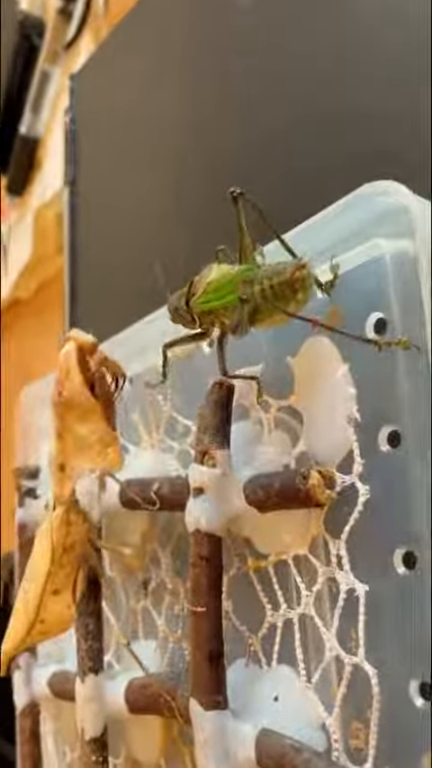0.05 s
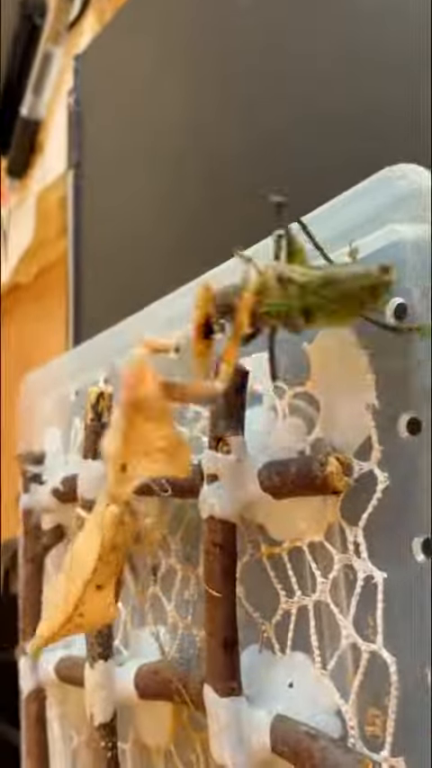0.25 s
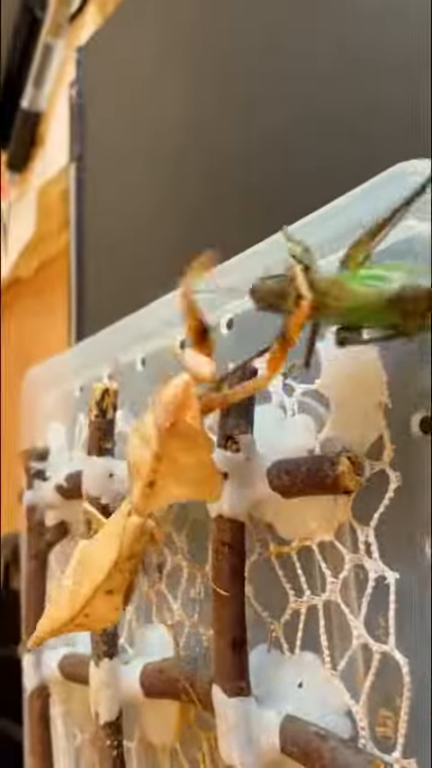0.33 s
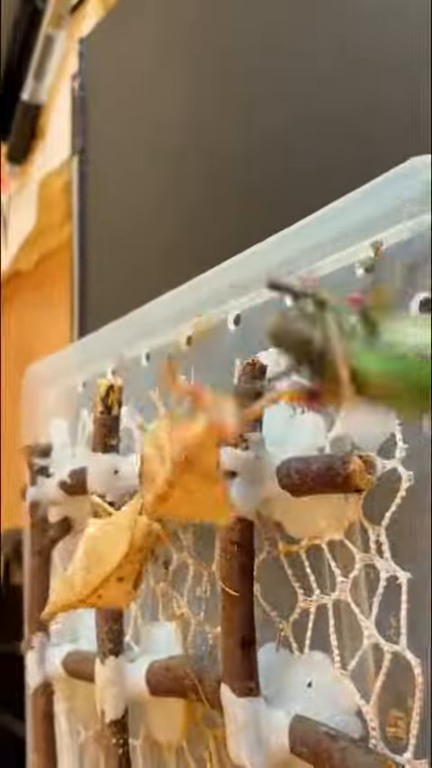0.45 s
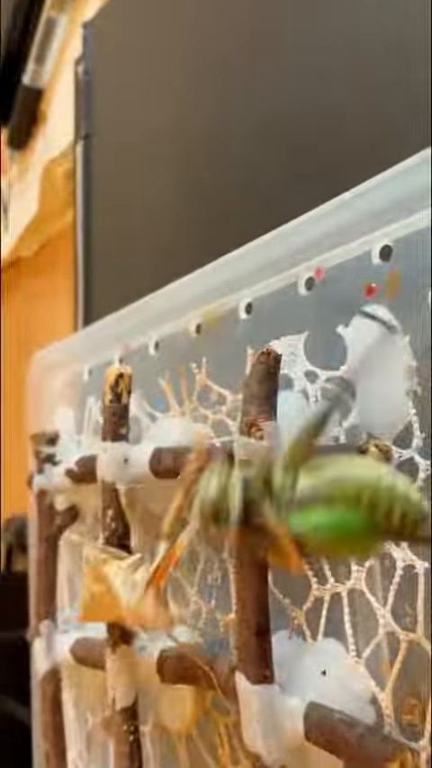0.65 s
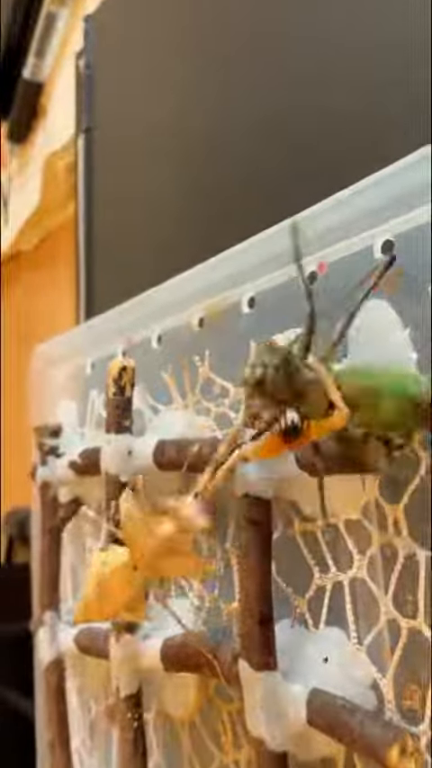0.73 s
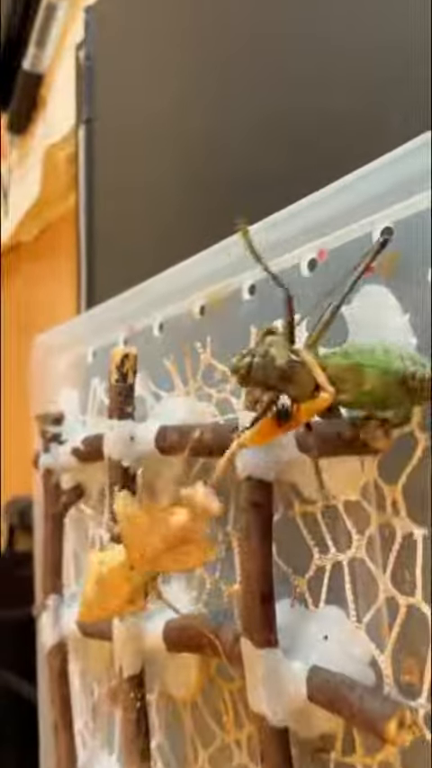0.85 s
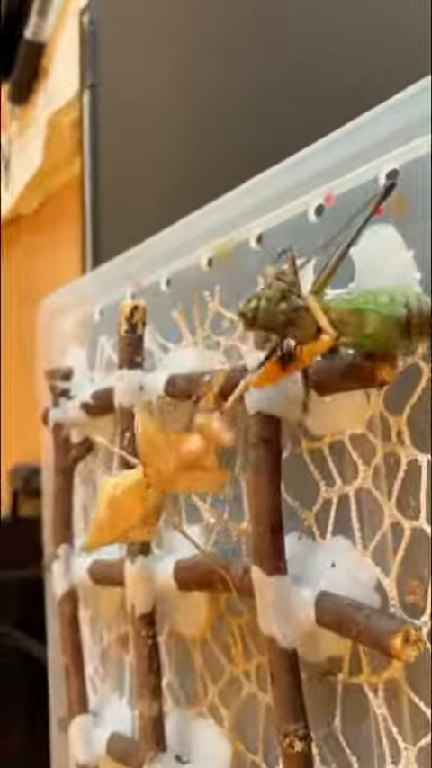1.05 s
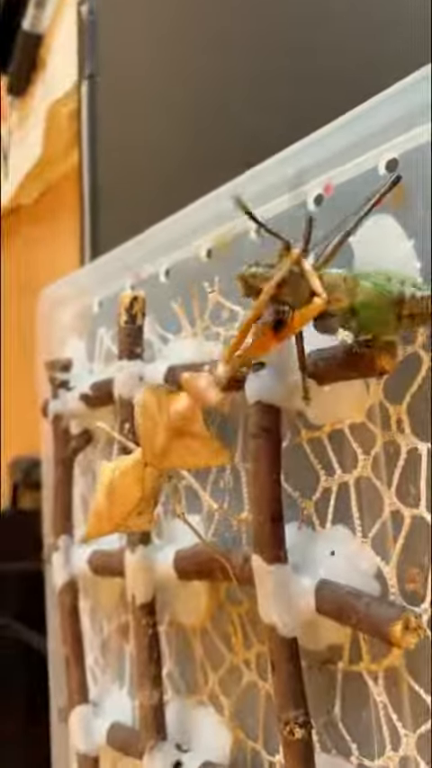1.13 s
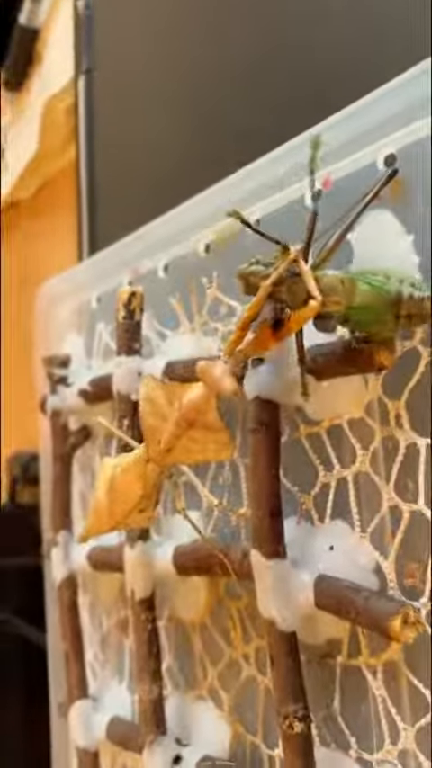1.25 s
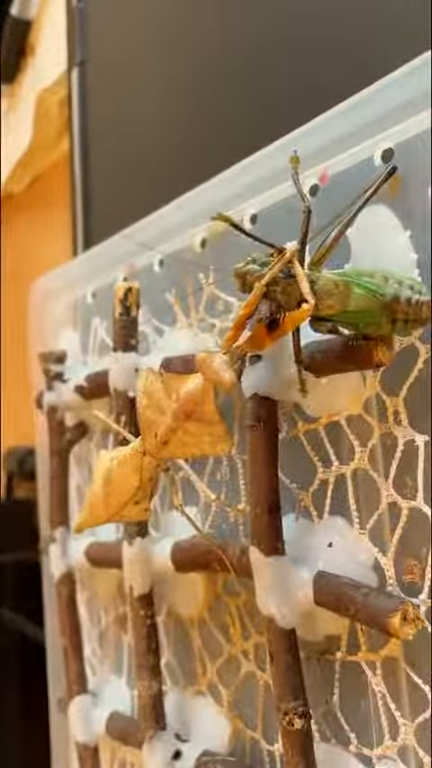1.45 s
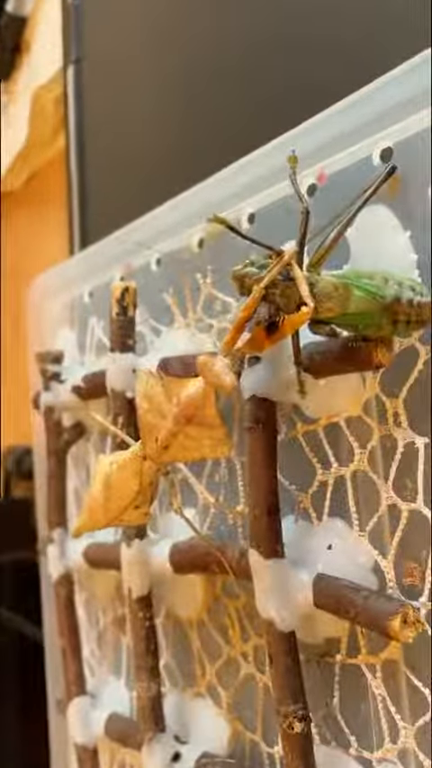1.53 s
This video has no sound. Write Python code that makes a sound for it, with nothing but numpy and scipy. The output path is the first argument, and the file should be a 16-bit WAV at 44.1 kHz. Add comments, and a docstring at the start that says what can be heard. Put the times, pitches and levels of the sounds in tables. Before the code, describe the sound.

One sharp snap, then light knocks and dry rustles as two insects scuffle on twigs.

```python
"""One sharp snap, then knocks, scrabbling and dry rustles: two insects scuffle close by in a small room.
They are a large bush cricket and a leaf-like insect, on a twig lattice in a plastic box.
Bodies and legs knock on twigs and plastic and make them ring; claws scratch and wings rustle.
The lattice thumps softly under their weight, over a low room rumble and a faint hiss."""
import sys
import numpy as np
from scipy import signal
from scipy.fft import rfft, irfft
from scipy.io import wavfile

SR = 44100
rng = np.random.default_rng(int(sys.argv[2]) if len(sys.argv) > 2 else 0)


def unload_wav(signal):
    """Save mono or channel-first audio to the path in sys.argv[1] as 16-bit WAV at rate SR, clipped to [-1, 1]."""
    wavfile.write(
        sys.argv[1],
        SR,
        np.round(np.clip(np.atleast_2d(signal).T, -1, 1) * 32767).astype(np.int16),
    )


N = 70560
TIME = np.arange(N) / SR
SPECTRUM_HZ = np.maximum(np.fft.rfftfreq(N, 1 / SR), 1)

# Brittle clicks: start_s, level_db
SNAP_CLICKS = [(0.205, -52), (.2085, -42.5), (0.2093, -39.5), (.2104, -37.5), (0.2105, -26), (.2122, -31),
               (0.2132, -36), (0.2125, -40), (0.2161, -45), (.2700, -48), (0.2727, -48.5), (.4760, -50),
               (.4860, -54), (1.149, -56.5), (1.3018, -73.5), (1.308, -76)]
# Tones each click rings with: pitch_hz, level_db, ring_s (time to fade by 60 dB)
SNAP_TONES = [(680, -34, 0.0071), (1253, -26, .0035), (2757, -21, .003), (4220, -26.5, 0.0046),
              (5240, -40, .004), (6720, -13, .0045), (7125, -4.5, .0035), (7750, -8, 0.0059),
              (8246, -7.5, .005), (9850, -14.5, 0.0018), (11600, -12, 0.0024), (12600, -11.5, 0.0032),
              (14000, -10.5, 0.002), (15300, -10.5, 0.0018)]
def snap():
    """Brittle clicks ring near 7 kHz. The first ones merge into one snap; faint ones follow."""
    out = np.zeros(N)
    for start_s, level_db in SNAP_CLICKS:
        force = contact(chatter=0.66, chatter_s=0.00097)
        add(out, start_s, from_db(level_db) * ring(force, SNAP_TONES))
    return room(panned(out, left_db=0.96), echo_db=-10.5)


# Knocks: start_s, thud_db, clack_db, tick_db, top_db, chatter_s, left_db, part_pitch_hz, part_db
KNOCKS = [(.3110, -62, -61, -60.5, -75, 0.0042, 12.5, 945, -59),
          (0.3945, -58, -46.5, -50, -55.5, 0.006, 4.5, 1443, -53),
          (0.4748, -65, -58, -60, -60.5, 0.00064, 9, 3550, -51.5),
          (0.4863, -63, -75, -53, -64, 0.0022, 6, 3530, -64),
          (.5050, -53, -46, -43, -56, 0.0025, 6, 4710, -44.5),
          (.5290, -70, -55.5, -51.5, -56, 0.0024, 5.5, 1700, -58.5),
          (.5360, -56, -66, -78, -51, 0.0038, 2, 428, -56.5),
          (.6520, -54, -80, -48.5, -65.5, 0.0028, 8, 970, -51.5),
          (0.692, -67, -77, -72, -87, 0.0033, 4, 1077, -64),
          (0.7079, -81, -71, -50, -77, 0.0044, 10, 1090, -54),
          (0.7468, -58, -46.5, -49, -73, 0.0015, 9.5, 926, -51),
          (.8290, -59, -58.5, -64.5, -75, .004, 4, 633, -59.5),
          (0.889, -69.5, -63, -76.5, -78, 0.00078, 3, 950, -67),
          (1.1494, -87, -67, -53.5, -64, 0.00055, 5.5, 1540, -63),
          (1.2050, -73.5, -71.5, -69.5, -86, 0.0056, 2.5, 945, -70.5),
          (1.2424, -75, -71, -77.5, -87, 0.0011, 11, 1740, -75.5),
          (1.4140, -101, -79, -83, -84, .002, 5, 950, -80.5)]
# Where the thud, clack, tick and top levels apply: pitch_hz
KNOCK_BANDS_HZ = [450, 1200, 4000, 9000]
# Tones of the twigs and plastic: pitch_hz, level_db, ring_s
BOX_TONES = [(185.2, -6.5, 0.09), (322, -3.5, .018), (607, -4.5, 0.013), (864, -4, 0.02), (1075, -8, 0.013),
             (1345, -5.5, .012), (1550, -5.5, 0.013), (2480, -6, 0.0065), (3190, -4, 0.0038),
             (4224, -5, 0.0033), (5070, -7, 0.0072), (6600, -6, 0.0023), (8350, -7.5, 0.0022),
             (10330, -3.5, .0012), (14000, -10, 0.001)]
def knocks():
    """Each knock, dull or hard, rings the lattice and box, plus one tone of the part it hits."""
    part_ring_cycles = 9
    out = np.zeros((2, N))
    for start_s, *band_db, chatter_s, left_db, part_hz, part_db in KNOCKS:
        hardness = list(zip(KNOCK_BANDS_HZ, band_db))
        tones = [(hz, db + at_hz(hardness, hz), ring_s) for hz, db, ring_s in BOX_TONES]
        tones.append((part_hz, part_db, part_ring_cycles / part_hz))
        force = contact(chatter=1, chatter_s=chatter_s)
        add(out, start_s, panned(ring(force, tones), left_db))
    return room(out, echo_db=-10)


# The snap's tail (first three rows), then dry rustles: peak_s, level_db, rise_s, fall_s
CRACKLE_SWELLS = [(.224, -45.5, .006, 0.013), (.2715, -50.5, .003, 0.0072), (.292, -55, .006, .004),
                  (.352, -61, .012, 0.013), (.3635, -54, 0.00091, 0.0018), (.375, -73, .003, 0.013),
                  (.479, -53.5, 0.0018, 0.018), (.5365, -35.5, 0.0025, 0.0045),
                  (.5502, -46.5, 0.0023, 0.0013), (.580, -56, .005, 0.0063), (.5902, -48.5, 0.0031, 0.0019),
                  (.709, -63, 0.012, 0.0068), (.84, -74.5, 0.068, 0.081), (1.125, -79, .007, 0.018),
                  (1.165, -67.5, .006, 0.02), (1.304, -76.5, .002, 0.017)]
# Their colour (how strong the lows and highs are): pitch_hz, relative_db
CRACKLE_COLOUR = [(300, -30), (2000, -19), (5000, -11), (7200, -7.5), (8800, -8), (10000, 0.5), (11000, -1),
                  (12500, -7.5), (16000, -16)]
def snap_tail_and_rustles():
    """The snap's bright, crackly tail fades in the room; after that, dry wings and legs rustle."""
    crackle = coloured(tiny_clicks(per_s=6400, spread_db=2.5), CRACKLE_COLOUR)
    return room(panned(swells(CRACKLE_SWELLS) * crackle, left_db=0.2), echo_db=-13.5)


# Single claw scrapes: peak_s, level_db, rise_s, fall_s
SCRAPES = [(.250, -56, .004, .006), (.272, -53.5, 0.0041, 0.0058), (.472, -61, .005, .004),
           (1.124, -68.5, 0.012, .016), (1.1445, -57.5, 0.0011, 0.0056), (1.168, -71, .004, 0.0091),
           (1.3035, -72, 0.0009, 0.0085)]
# Their colour: pitch_hz, relative_db
SCRAPE_COLOUR = [(300, -15), (900, -10.5), (1600, -4.5), (2100, -3.5), (3000, 2.5), (4800, -2.5),
                 (7000, -10.5), (16000, -14)]
def scrapes():
    """A claw drags briefly over bark or plastic."""
    scratch = coloured(tiny_clicks(per_s=5400, spread_db=2.5), SCRAPE_COLOUR)
    return room(panned(swells(SCRAPES) * scratch, left_db=5.5), echo_db=-9.5)


# Loudness of the scrabbling: time_s, level_db
SCRABBLE_LEVEL = [(.2, -90), (.25, -57.5), (.29, -71), (.32, -65.5), (.37, -68), (.405, -61.5), (.46, -64),
                  (.55, -87), (.63, -100), (.68, -73.5), (.735, -60.5), (.783, -57.5), (.81, -68.5),
                  (.855, -65.5), (.88, -82), (.93, -78), (1.01, -91.5), (1.08, -96), (1.2, -83), (1.6, -99)]
# Its colour: pitch_hz, relative_db
SCRABBLE_COLOUR = [(200, -5), (500, -5.5), (900, -1.5), (1900, -1), (3000, -6), (4800, -7), (7000, -18),
                   (8500, -22.5), (11000, -16.5), (16000, -26)]
def scrabble():
    """Claws catch and slip on the twigs, left of centre."""
    scratch = coloured(tiny_clicks(per_s=1500, spread_db=2.0), SCRABBLE_COLOUR)
    return room(panned(loudness(SCRABBLE_LEVEL) * scratch, left_db=5), echo_db=-6)


# Soft low thumps: start_s, pitch_hz, level_db, length_s
THUMPS = [(.03, 75.3, -56, 0.051), (.305, 164.6, -51.5, 0.042), (.465, 62, -55, 0.032),
          (.56, 80, -51, .055), (.648, 109, -48, 0.04), (.672, 86, -46, 0.059), (1.10, 68, -51.5, .055),
          (1.524, 66, -55, .055)]
def thumps():
    """The lattice gives under the insects: a low tone swells, sinks in pitch and fades."""
    pitch_drop = 0.12
    out = np.zeros(N)
    for start_s, pitch_hz, level_db, length_s in THUMPS:
        progress = np.linspace(0, 1, int(length_s * SR))
        sinking_hz = pitch_hz * (1 - pitch_drop * progress)
        tone = np.sin(2 * np.pi * np.cumsum(sinking_hz) / SR)
        add(out, start_s, from_db(level_db) * np.sin(np.pi * progress) * tone)
    return out


# Loudness of the rumble: time_s, level_db
RUMBLE_LEVEL = [(0, -64), (.15, -62), (.3, -57.5), (.55, -58), (.63, -60), (.8, -57), (1.0, -61),
                (1.2, -61.5), (1.6, -63.5)]
# Colours of the rumble and the hiss: pitch_hz, relative_db
RUMBLE_COLOUR = [(15, -35.5), (30, -22), (48, -3), (70, -2), (105, -5), (150, -7), (195, -4), (245, -18),
                 (320, -22), (500, -27), (900, -39), (3000, -50.5), (16000, -68)]
HISS_COLOUR = [(500, 1.5), (2000, -4), (9000, -9), (12000, -7.5), (14000, 0), (16000, -3)]
def background():
    """A low room rumble grows a little during the scuffle, with a faint steady hiss."""
    rumble = loudness(RUMBLE_LEVEL) * stereo_noise(RUMBLE_COLOUR)
    hiss = from_db(-83.5) * stereo_noise(HISS_COLOUR)
    return rumble + hiss


# How alike the background is in both ears: pitch_hz, likeness (1 = the same)
EAR_LIKENESS = [(60, 0.97), (180, .94), (400, .7), (1500, .4), (15000, .3)]
def stereo_noise(colour):
    """Steady noise, centred in the bass and wide in the treble."""
    alike = at_hz(EAR_LIKENESS, SPECTRUM_HZ)
    middle, side = rfft(rng.standard_normal((2, N)))
    spectrum = np.sqrt(1 + alike) * middle + np.sqrt(1 - alike) * side * [[1], [-1]]
    return coloured(irfft(spectrum, N), colour)


# How long the room rings: pitch_hz, ring_s
ROOM_RING = [(300, .38), (1500, .38), (7000, .42), (15000, .3)]
# Colour of its echoes: pitch_hz, relative_db
ROOM_COLOUR = [(100, -4.5), (500, 3), (900, -0.5), (1500, 4), (4000, -2), (7200, 3), (10000, -3.5),
               (15000, -2)]
def room(x, echo_db):
    """Add quick echoes from box and table, alike in both ears, and the room's wide, fading tail."""
    onset_s, near_fade_s, near_db = 0.001, .012, -5
    t, edges_hz = TIME[:SR // 2], np.geomspace(100, 17000, 13)
    onset = 1 - np.exp(-(t / onset_s) ** 2)
    echoes = 0
    for low, high in zip(edges_hz, edges_hz[1:]):
        hz = np.sqrt(low * high)
        fade = from_db(-60 * t / at_hz(ROOM_RING, hz))
        noise = rng.standard_normal((3, len(t)))
        tail = noise[:2] * energy_one(fade * onset)
        near = from_db(near_db) * noise[2] * energy_one(np.exp(-t / near_fade_s) * onset)
        band = signal.butter(2, [low, high], "band", fs=SR, output="sos")
        echoes = echoes + from_db(at_hz(ROOM_COLOUR, hz)) * signal.sosfilt(band, tail + near)
    return x + from_db(echo_db) * signal.fftconvolve(x, echoes, axes=1)[:, :N]


def contact(chatter, chatter_s):
    """The force of a hit: one click, then a dying spray of tiny touches."""
    t = TIME[:SR // 20]
    spray = rng.standard_normal(len(t)) * rng.exponential(1, len(t))
    return (t == 0) + chatter * energy_one(spray * np.exp(-t / chatter_s))


def ring(force, tones):
    """A force sets each tone ringing; filtering twice keeps the gaps between tones quiet."""
    level_window_s = .008  # a tone's level is its energy spread over this time
    out = 0
    for hz, db, ring_s in tones:
        decay = from_db(-60 / (ring_s * SR))
        resonator = [1, 0, -1, 1, -2 * decay * np.cos(2 * np.pi * hz / SR), decay * decay]
        out = out + from_db(db) * energy_one(signal.sosfilt([resonator, resonator], force))
    return out * np.sqrt(level_window_s * SR)


def tiny_clicks(per_s, spread_db):
    """Random clicks of uneven size."""
    clicks = (rng.random(N) < per_s / SR) * rng.choice([-1, 1], N)
    return clicks * from_db(spread_db * np.minimum(rng.exponential(1, N), 3))


def swells(rows):
    """Loudness that rises to each peak and falls away again."""
    return sum(from_db(db) * np.exp(-np.maximum((peak_s - TIME) / rise_s, (TIME - peak_s) / fall_s))
               for peak_s, db, rise_s, fall_s in rows)


def loudness(rows):
    """Loudness that glides from one listed level to the next."""
    return from_db(np.interp(TIME, *np.transpose(rows)))


def coloured(x, colour):
    """Shape the lows and highs of x, then set its average power to 1."""
    shaped = irfft(rfft(x) * from_db(at_hz(colour, SPECTRUM_HZ)), N)
    return shaped / np.sqrt(np.mean(shaped ** 2) + 1e-20)


def panned(x, left_db):
    """Stereo pair with the left side louder by left_db."""
    gains = from_db([[left_db / 2], [-left_db / 2]])
    return x * gains / gains.mean()


def add(out, start_s, x):
    i = int(start_s * SR)
    out[..., i:i + x.shape[-1]] += x[..., :N - i]


def at_hz(rows, hz):
    """Read a table's value at any pitch."""
    pitches, values = np.transpose(rows)
    return np.interp(np.log(hz), np.log(pitches), values)


def from_db(db):
    return 10 ** (np.asarray(db) / 20)


def energy_one(x):
    return x / np.sqrt(np.sum(x ** 2) + 1e-20)


def scene():
    """The scuffle over the sound of the room."""
    return background() + snap() + knocks() + snap_tail_and_rustles() + scrapes() + scrabble() + thumps()


def record(dry):
    """Cut the treble steeply above 16 kHz."""
    return signal.sosfilt(signal.ellip(10, .2, 80, 16000, fs=SR, output="sos"), dry)


dry = scene()
out = record(dry)
unload_wav(out)
```